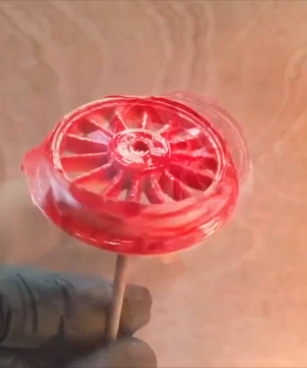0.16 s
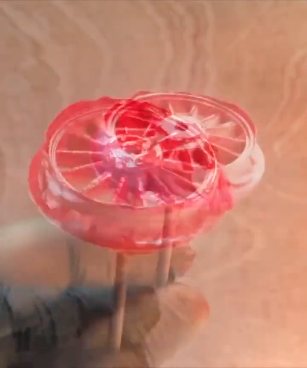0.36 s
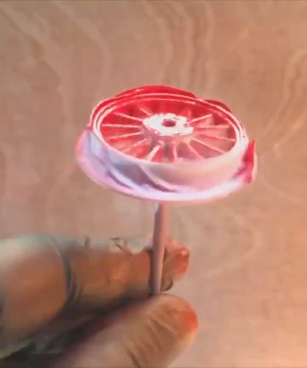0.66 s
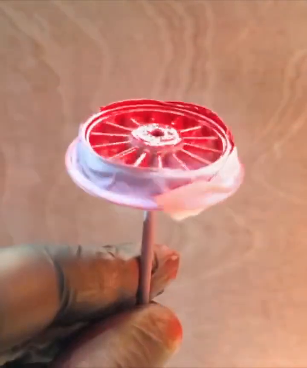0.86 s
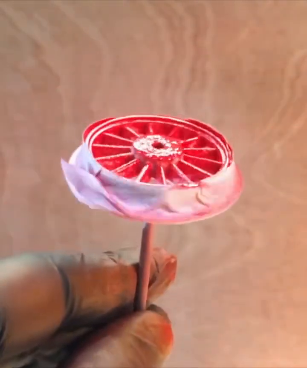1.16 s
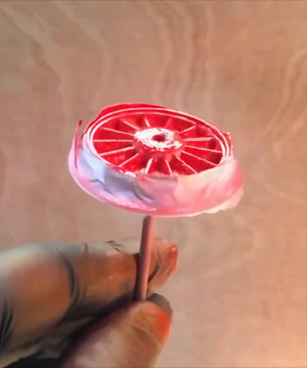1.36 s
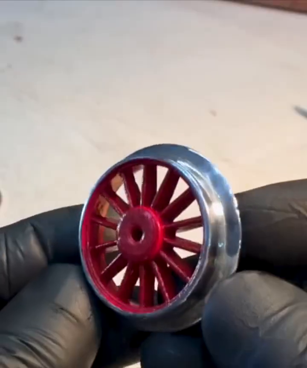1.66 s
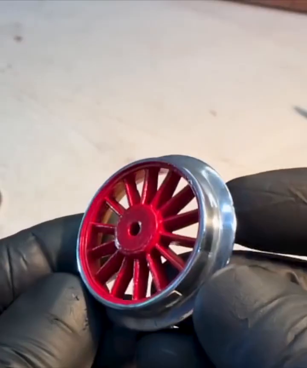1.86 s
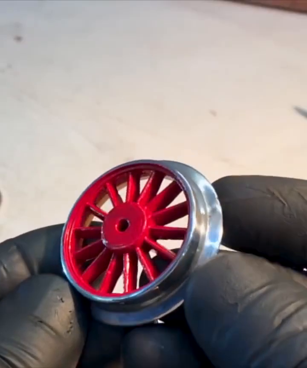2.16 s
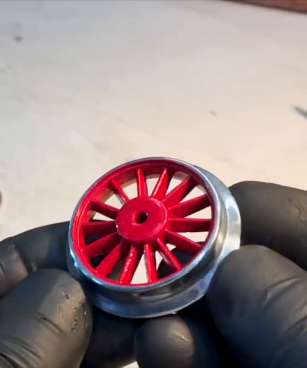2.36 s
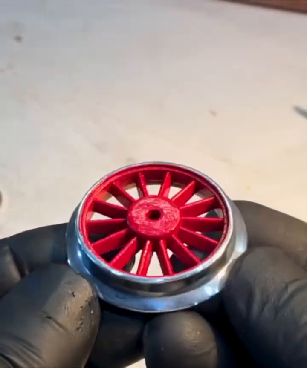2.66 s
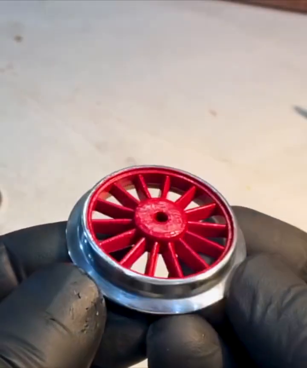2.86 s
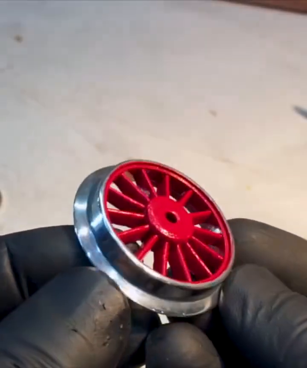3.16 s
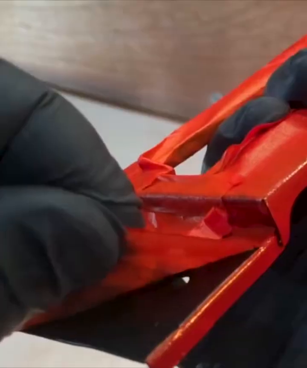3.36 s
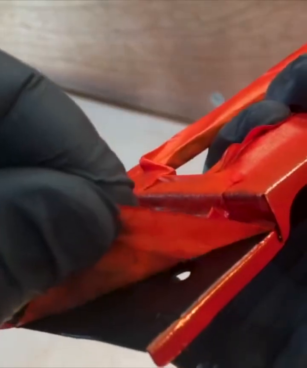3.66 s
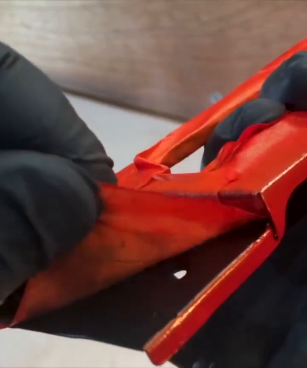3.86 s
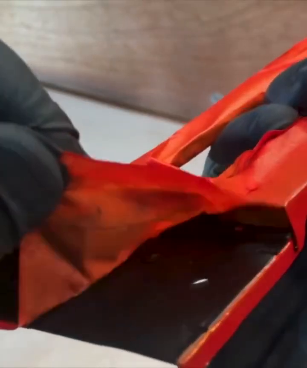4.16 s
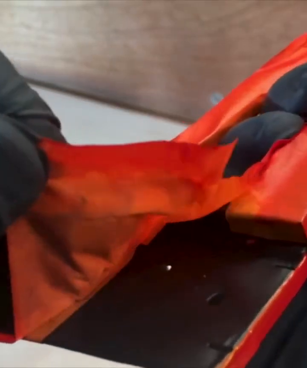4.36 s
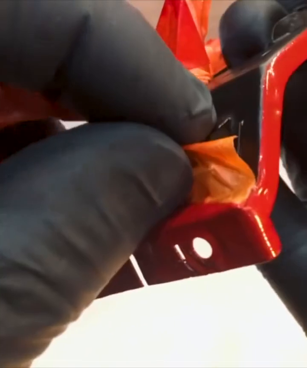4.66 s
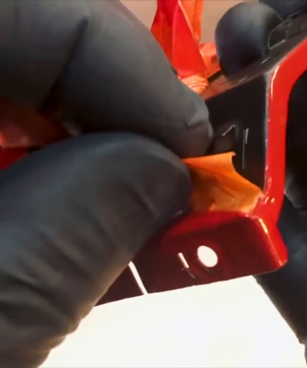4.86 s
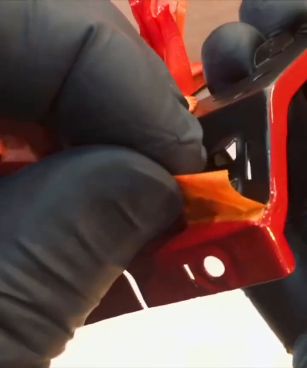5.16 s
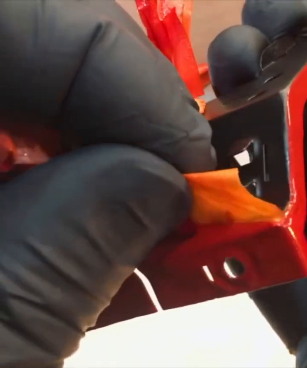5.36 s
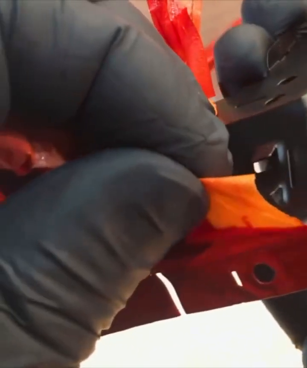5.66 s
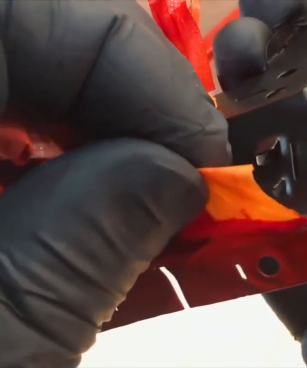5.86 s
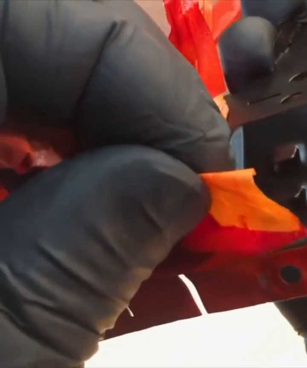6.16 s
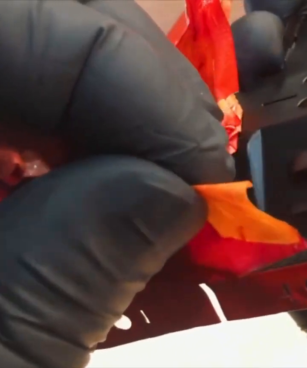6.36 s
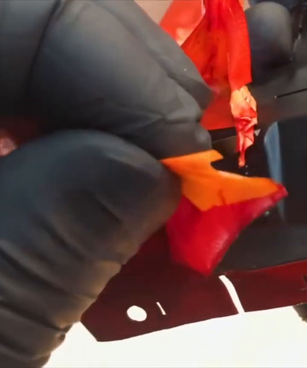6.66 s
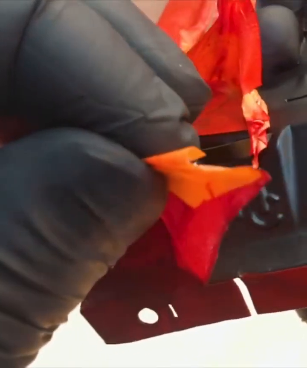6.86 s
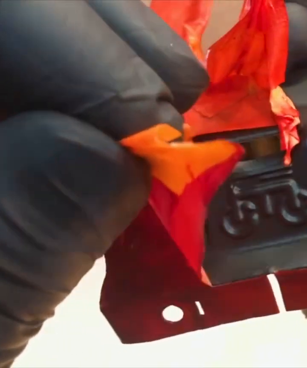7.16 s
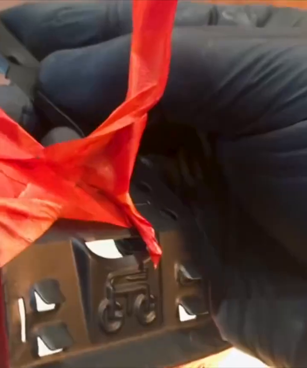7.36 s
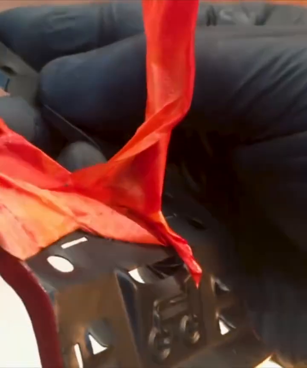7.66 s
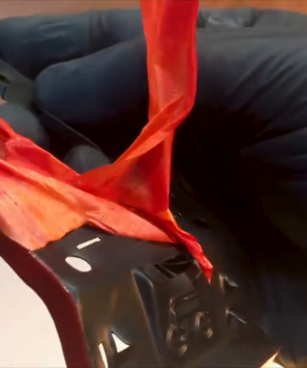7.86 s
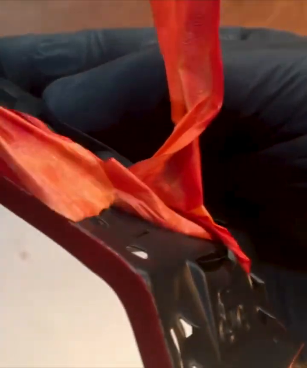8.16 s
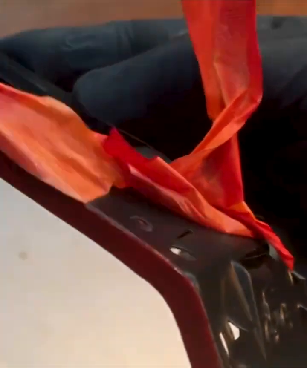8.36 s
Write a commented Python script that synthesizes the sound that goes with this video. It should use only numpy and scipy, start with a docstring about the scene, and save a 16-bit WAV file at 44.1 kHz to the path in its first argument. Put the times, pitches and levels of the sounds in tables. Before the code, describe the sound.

A spray can hisses brightly, swelling and spitting softly before it stops dead. A few tiny ticks and a faint glove rub dot the quiet workshop. Then masking tape is peeled off a painted metal frame close to the microphone: the glue crackles and the paper rustles and snaps, with one hard pull early on and smaller tugs after it, over a faint low hum.

```python
"""Over faint workshop room tone, a spray can hisses at a small part, swelling as it comes near and
spitting softly, then stops dead at 1.7 s. A few small ticks dot the quiet, and gloves rub faintly.
From 3.4 s a low hum wavers in the room while gloved hands peel masking tape off a painted metal frame,
close to a single microphone: glue threads crackle as they let go, the frame rings under them, and
the paper snaps and rustles, hardest near 4.2 s, then in smaller tugs to the end."""
import sys
import numpy as np
from scipy import signal
from scipy.fft import rfft, irfft, next_fast_len
from scipy.io import wavfile
from scipy.ndimage import uniform_filter1d

SR = 44100
rng = np.random.default_rng(int(sys.argv[2]) if len(sys.argv) > 2 else 0)


def master(y):
    """Save y as 16-bit WAV."""
    cut = np.clip(np.atleast_2d(y).T, -1, 1)
    pcm = np.round(cut * 32767)  # scale
    wavfile.write(sys.argv[1], SR, pcm.astype(np.int16))


N = 375732


def amp(db):
    return 10 ** (np.asarray(db) / 20)


def unit_rms(x):
    return x / np.sqrt(np.mean(x ** 2) + 1e-20)


def place(mix, start_s, sound):
    part = mix[round(start_s * SR):][:len(sound)]
    part += sound[:len(part)]


def equalise(x, curve):
    """Shapes x with an EQ curve drawn on a log-frequency axis, to rms 1."""
    curve_hz, curve_db = np.transpose(curve)
    size = next_fast_len(len(x), True)
    hz = np.fft.rfftfreq(size, 1 / SR)
    gain = amp(np.interp(np.log(hz + 1), np.log(curve_hz + 1), curve_db, left=-90))
    return unit_rms(irfft(rfft(x, size) * gain, size)[:len(x)])


def wander(length, smooth_s):
    """Smooth random modulation of rms 1."""
    width = max(round(smooth_s * SR), 2)
    return unit_rms(uniform_filter1d(uniform_filter1d(rng.standard_normal(length), width), width))


def ring(x, hz, width_hz):
    """Two-pole resonance, to rms 1."""
    r = np.exp(-np.pi * width_hz / SR)
    return unit_rms(signal.lfilter([1, 0, -1], [1, -2 * r * np.cos(2 * np.pi * hz / SR), r * r], x))


# EQ of the workshop's air: (frequency [Hz], relative level [dB])
ROOM_EQ = [(15, -7.5), (28, 3), (45, 4), (62, -6.5), (110, -13), (230, -20.5), (480, -29), (3700, -31),
           (13300, -35.5), (15700, -41)]


def room_tone(level_db=-65):
    """A steady, bass-heavy bed of air."""
    return amp(level_db) * equalise(rng.standard_normal(N), ROOM_EQ)


# Fader ride of the rumble: (time [s], level [dB])
RUMBLE_RIDE = [(1.7, -72), (3.3, -73), (3.45, -76), (4.2, -67.5), (4.4, -81), (7.7, -86.5), (8.52, -74)]


def rumble():
    """A narrow band of low noise that comes and goes."""
    times, db = np.transpose(RUMBLE_RIDE)
    fader = amp(np.interp(np.arange(N) / SR, times, db))
    return fader * ring(rng.standard_normal(N), hz=111, width_hz=27)


# EQ of the jet's bright hiss: (frequency [Hz], relative level [dB])
HISS_EQ = [(900, -21.5), (2200, -18), (4400, -8), (5200, -6.5), (5800, -4), (6500, -7.5), (7200, -6),
           (8000, -8), (9200, -6), (10600, -7.5), (11300, -2.5), (12300, -2), (12900, 1.5), (14200, 0),
           (14600, 4), (15700, 1.5)]
# EQ of the jet's dull roar: (frequency [Hz], relative level [dB])
ROAR_EQ = [(18, -48), (30, -15), (54, 3), (187, 1.5), (2500, -2), (3800, -3), (6500, -26)]


def spray_can(mix, approach_s=.49, swell_s=.12, stop_s=1.68):
    """A turbulent jet, gritty with droplets: hiss and roar flutter together and swell as it nears."""
    t = np.arange(2 * SR) / SR
    near = (1 + np.tanh((t - approach_s) / swell_s / 2)) / 2  # 0 far, 1 close
    flutter = amp(.8 * wander(len(t), .004) + .3 * wander(len(t), .03))
    grit = amp(2.8 * wander(len(t), .0001))
    hiss = amp(-39.5 + 13 * near) * equalise(grit * rng.standard_normal(len(t)), HISS_EQ)
    top = signal.sosfiltfilt(signal.butter(2, 11000, "high", fs=SR, output="sos"), hiss)
    hiss = hiss - (1 - amp(-4 * (1 - near))) * top  # duller from afar
    roar = amp(-53 + 6 * near) * equalise(grit * rng.standard_normal(len(t)), ROAR_EQ)
    attack = amp(5 * np.exp(-t / .035))  # starts a little hard, then settles
    gate = amp(-3500 * np.maximum(t - stop_s, 0))
    place(mix, 0, attack * flutter * gate * (hiss + roar))


# Paint spitting at the nozzle: (time [s], peak level [dB])
NOZZLE_SPITS = [(0.623, -20), (0.729, -19), (0.798, -23.5), (1.065, -24.5), (1.163, -20.5)]


def nozzle_spits(mix):
    """Each spit of paint is a tiny, heavily damped pop."""
    pop = ring(signal.windows.hann(256) ** 3000, hz=1000, width_hz=6000)
    for time_s, db in NOZZLE_SPITS:
        place(mix, time_s, amp(db) * pop / abs(pop).max())


# Single cracks of glove, glue and paper:
# (time [s], body peak [dB], body pitch [Hz], treble against body [dB])
CRACKS = [(2.0277, -53, 2970, 1), (2.256, -56, 2260, 8.5), (2.7013, -49, 7560, -2),
          (3.4579, -30.5, 6800, 4), (3.535, -41, 4530, -8), (3.709, -35, 6000, -7), (3.893, -40, 2450, 3),
          (4.192, -15, 6400, -2), (4.2112, -6, 3840, -15), (4.2148, -16, 4170, -10),
          (4.2235, -12, 4600, -12), (4.2847, -19, 3760, 0), (4.3223, -16.5, 3340, -26),
          (4.486, -30, 6600, -1), (4.6846, -40, 3660, 6), (4.7497, -34.5, 3560, -4),
          (5.0149, -33.5, 8300, 3.5), (5.096, -24, 7500, 7.5), (5.111, -38, 7900, 0),
          (5.1977, -35, 7000, 5), (5.2045, -39, 7580, -20), (5.2391, -11.5, 7150, 4),
          (5.344, -40.5, 6700, -10), (5.567, -32.5, 5400, -19), (5.693, -27.5, 5170, -5),
          (5.744, -44.5, 6680, 14), (5.9809, -37.5, 5095, 4.5), (6.161, -39, 6710, 2),
          (6.1789, -37, 5200, 7.5), (6.2507, -41, 6050, 11), (6.3203, -45, 4335, 0), (6.3684, -31, 6280, 4),
          (6.4223, -24, 6500, -15), (6.4912, -30.5, 7500, 4.5), (6.494, -27, 7900, 8),
          (6.576, -35, 6530, -10), (6.6512, -29, 5890, 0), (6.9496, -33.5, 2280, 3), (6.9837, -36, 4170, 2),
          (7.026, -31, 6340, -14), (7.049, -30, 4540, 2), (7.257, -31.5, 4500, 0),
          (7.3152, -31.5, 2253, -10), (7.5628, -22, 3220, 10), (7.5698, -26, 7560, -7),
          (7.613, -31, 7770, -3), (7.6515, -21.5, 7700, 6), (7.83, -36, 6465, -5), (7.9824, -35, 7210, 2),
          (8.0399, -33, 6440, -15), (8.086, -33.5, 6500, -9), (8.1848, -30.5, 6940, -12),
          (8.1877, -25.5, 6900, -3), (8.2621, -23, 6780, -22), (8.268, -24, 6900, -18),
          (8.2734, -28.5, 7170, -8), (8.332, -31.5, 6300, 5), (8.3495, -30, 6300, 0),
          (8.458, -42, 6160, -2)]


def cracks(mix, creep_s=.005):
    """Each crack creeps up, breaks in a millisecond, rings the paper and scatters off the bench."""
    t = np.arange(2048) / SR - creep_s
    creep = .1 * amp(60 * np.minimum(t, 0) / .007)
    snap = amp(-60 * abs(t) / .0017)
    scatter = .04 * amp(-60 * abs(t) / .065)
    envelope = np.where(t < 0, creep, snap + scatter)
    low_cut = signal.butter(2, 1700, "high", fs=SR)  # a thin strip radiates little bass
    for time_s, db, hz, treble_db in CRACKS:
        burst = envelope * rng.standard_normal(len(t))
        pitched = ring(ring(burst, hz, .7 * hz), hz, .5 * hz)
        broad = ring(ring(burst, 3600, 6000), 3600, 6000)
        frame_knock = ring(burst, 1100, 910)
        body = signal.lfilter(*low_cut, pitched + .4 * broad) + .062 * frame_knock
        treble = ring(ring(burst, 15700, 11500), 7600, 13500)
        crack = body / abs(body).max() + amp(treble_db) * treble / abs(treble).max()
        place(mix, time_s - creep_s, amp(db) * crack)


# Accents where the hand tugs harder:
# (peak time [s], rise [s], fall [s], crackle level [dB], frame ring level [dB])
HAND_TUGS = [(2.903, .1, .15, -73.5, -79.5), (3.148, 0.27, .2, -70, -94), (3.37, 0.055, 0.24, -49.5, -71),
             (3.53, 0.45, 0.053, -55, -69), (3.89, 0.1, 0.25, -39.5, -59), (4.2, 0.097, 0.069, -26.5, -42),
             (4.41, 0.024, 0.04, -37.5, -50), (4.545, 0.25, 0.23, -40, -49),
             (4.677, 0.11, 0.043, -48.5, -63), (4.751, 0.1, 0.086, -54.5, -60),
             (4.89, 0.046, 0.15, -59.5, -69.5), (5.04, 0.026, 0.024, -55, -74), (5.2, .05, 0.018, -59, -72),
             (5.245, .01, 0.12, -57, -70), (5.468, 0.2, 0.1, -54, -78), (5.569, 0.062, 0.042, -51, -81),
             (5.723, 0.068, 0.077, -52.5, -78), (6.05, 0.47, 0.67, -54.5, -60.5),
             (6.39, 0.097, 0.14, -47.5, -75), (6.495, 0.095, 0.077, -41.5, -54),
             (6.645, 0.041, 0.066, -54, -61), (6.956, 0.26, 0.31, -50, -59.5),
             (7.21, 0.11, 0.15, -53.5, -57.5), (7.567, 0.023, 0.13, -40, -58),
             (7.636, 0.0062, 0.045, -32.5, -59), (7.825, 0.045, 0.2, -50.5, -73),
             (8.062, 0.13, 0.065, -46, -63.5), (8.266, 0.023, 0.039, -41, -55),
             (8.376, 0.03, 0.077, -47, -56.5), (8.459, 0.005, 1, -45, -56)]


def hand_effort(t, from_db, to_db, frame_db, tug_depth_db=20):
    """Faders for crackle and frame ring: the steady pull and its tugs add in power."""
    steady_db = np.linspace(from_db, to_db, len(t))
    power = amp([steady_db, steady_db + frame_db]) ** 2
    for peak_s, rise_s, fall_s, *levels_db in HAND_TUGS:
        if t[0] <= peak_s <= t[-1] + 1 / SR:
            off_peak = np.maximum((peak_s - t) / rise_s, (t - peak_s) / fall_s)
            power = power + amp(np.c_[levels_db] - tug_depth_db * off_peak) ** 2
    return np.sqrt(power)


# Bands of the tape, shaken separately: (low edge [Hz], high edge [Hz])
TAPE_BANDS = [(1000, 5000), (5000, 8400), (8400, 18000)]


def glue_crackle(eq, start_s, end_s, from_db, to_db, frame_db, frame_hz, width_hz, fizz):
    """Glue threads let go in clumps; each shakes the tape and the frame, some parts more than others."""
    t = np.arange(start_s, end_s, 1 / SR)
    crackle_gain, frame_gain = hand_effort(t, from_db, to_db, frame_db)
    clumps = amp(2.4 * wander(len(t), .0052))
    breaks = rng.random(len(t)) < 800 * clumps / SR  # about 800 threads a second
    grains = breaks * amp(3.5 * np.minimum(rng.exponential(1, len(t)), 2.6))
    sends = amp(3.5 * rng.standard_normal((4, len(t))))  # three tape bands, then the frame
    decay = amp(-60 * np.arange(256) / SR / .002)
    energy = signal.oaconvolve((grains * sends) ** 2, decay[None] ** 2, axes=1)[:, :len(t)]
    shaking = unit_rms(energy.clip(0) ** .5)
    drive = (fizz * clumps ** .5 + shaking) * rng.standard_normal(sends.shape)
    strip = 0
    for band_drive, edges_hz in zip(drive, TAPE_BANDS):
        twist = amp(1.6 * wander(len(t), .03))  # the strip twists and its colour shifts
        strip = strip + twist * signal.lfilter(*signal.butter(2, edges_hz, "band", fs=SR), band_drive)
    tape = crackle_gain * equalise(strip, eq)
    metal = frame_gain * ring(ring(drive[-1], frame_hz, width_hz), frame_hz, 1700)
    return (tape + metal) * signal.windows.tukey(len(t), .004)


# EQ curves of the tape's changing tone, each: (frequency [Hz], relative level [dB])
TAPE_EQS = [
    [(1650, -51.5), (2950, -21), (3650, -6), (4450, -7), (6300, -2), (8300, -3.5), (9730, -1), (11900, -4),
     (13400, 1), (15600, 1)],
    [(1650, -41), (2800, -8), (4700, -6), (5250, 4.5), (5900, -4), (6800, -1.5), (9700, 0.5), (11300, -10),
     (14100, 0.5), (15650, -9)],
    [(1650, -18), (2800, -11), (3400, -4.5), (4380, 4.5), (5430, -0.5), (6410, 1.5), (8550, -1.5),
     (9590, -1.5), (12800, -0.5), (15600, -1)],
    [(1650, -40.5), (2800, -22), (4910, -8), (6550, -2.5), (8550, 0), (9250, 1), (11400, -8), (13800, -0.5),
     (15600, -4)],
]
# Stretches of rubbing and peeling: (start [s], end [s], crackle at start [dB], crackle at end [dB],
# frame ring against crackle [dB], frame pitch [Hz], ring width [Hz], smooth fizz against grains [ratio])
STRETCHES = [(2.8, 3.361, -93, -80, -6, 2220, 2700, 1.2), (3.365, 4.33, -59.5, -46, -14, 2236, 1550, 1.24),
             (4.331, 4.577, -38.5, -65, -15, 2260, 1500, 1.5),
             (4.578, 4.997, -65, -66, -22, 3100, 1500, 0.71),
             (4.999, 5.857, -68.5, -59.5, -28, 2370, 3370, 0.51),
             (5.855, 6.291, -70, -59, -22, 2740, 3020, 0.93),
             (6.289, 7.4, -52, -62, -13.5, 2290, 380, 0.74), (7.395, 7.7, -61.5, -60, -14, 2600, 2180, 1.5),
             (7.697, 8.53, -63.5, -52, -15.5, 2180, 2220, 1.24)]


def tape_peeling(mix):
    """A faint glove rub, then tape peeling in eight stretches with four tone colours."""
    colours = [0, 0, 0, 0, 1, 2, 2, 3, 3]
    for colour, (start_s, *settings) in zip(colours, STRETCHES):
        place(mix, start_s, glue_crackle(TAPE_EQS[colour], start_s, *settings))


# Pitch and fader ride of the room's hum: (time [s], pitch [Hz], level [dB])
HUM_RIDE = [(3.37, 40.56, -60), (4.49, 39.8, -62.5), (4.62, 40, -55.5), (6.53, 38.42, -56),
            (6.7, 36.84, -68.5), (7.299, 36.83, -59.5), (7.43, 31.7, -73), (8.1, 31.3, -64),
            (8.52, 33.4, -55.5)]


def room_hum(mix):
    """A sub-bass tone, wavering in pitch and level, with a steady skirt of noise."""
    times, hz, db = np.transpose(HUM_RIDE)
    t = np.arange(times[0], N / SR, 1 / SR)
    pitch_hz = np.interp(t, times, hz) * (1 + .021 * wander(len(t), .088))
    waver = amp(3.2 * wander(len(t), .074))
    tone = np.sqrt(2) * np.sin(2 * np.pi * np.cumsum(pitch_hz) / SR) * waver
    skirt = equalise(rng.standard_normal(len(t)), [(18, -20), (30, -2.5), (60, 15), (130, -14)])
    hum = amp(np.interp(t, times, db)) * tone + amp(-67) * skirt
    fade_in = np.minimum((t - times[0]) / .013, 1)
    place(mix, times[0], fade_in * hum)


# Handling noise: (time [s], length [s], puff level [dB], creak pitch [Hz], creak level [dB],
# thump level [dB])
HAND_RUSTLES = [(3.803, 0.14, -69, 940, -67.5, -102), (4.126, 0.1, -63, 820, -56.5, -69),
                (4.358, 0.25, -62, 897, -67, -80), (4.648, 0.059, -57.5, 900, -68.5, -69),
                (5.237, 0.06, -61, 884, -78, -69), (6.45, 0.11, -62, 876, -81, -74),
                (7.552, 0.12, -61, 870, -80, -61.5), (8.457, 0.16, -51, 690, -64, -75)]


def hand_rustles(mix):
    """Hands shift the part: each move is a soft, broad puff with a lumpy creak and a low thump."""
    puff_eq = [(120, -9), (300, -4.5), (700, -23), (1800, -6), (3000, -11)]
    for time_s, length_s, puff_db, creak_hz, creak_db, thump_db in HAND_RUSTLES:
        n = round(length_s * SR)
        puff = equalise(rng.standard_normal(n), puff_eq)
        lumps = amp(3.5 * wander(n, .005))
        steady_creak = ring(rng.standard_normal(2 * n), creak_hz, width_hz=280)
        speed = (1 + .098 * wander(n, .0142)).clip(.5, 2)  # the pitch bends as the grip changes
        creak = lumps * np.interp(np.cumsum(speed), np.arange(2 * n), steady_creak)
        thump = ring(rng.standard_normal(n), hz=87, width_hz=82)
        rustle = amp(puff_db) * puff + amp(creak_db) * creak + amp(thump_db) * thump
        place(mix, time_s, rustle * signal.windows.tukey(n, .45))


def scene():
    """The bed, then each layer in order of entry, the same on both channels."""
    mix = room_tone() + rumble()
    for add_layer in (spray_can, nozzle_spits, cracks, tape_peeling, room_hum, hand_rustles):
        add_layer(mix)
    return np.array([mix, mix])


# Notches of the microphone housing: (centre [Hz], width [Hz], gain [dB])
HOUSING_NOTCHES = [(4950, 330, -5), (8350, 520, -5)]


def record(dry):
    """The microphone housing cuts two narrow dips; a steep high cut follows."""
    out = dry
    for hz, width_hz, db in HOUSING_NOTCHES:
        b, a = signal.iirpeak(hz, hz / width_hz, SR)
        out = out - (1 - amp(db)) * signal.lfilter(b, a, out)
    high_cut = signal.firwin(1279, 15715, window=("kaiser", 10), fs=SR)
    return signal.oaconvolve(out, high_cut[None], "same")


dry = scene()
out = record(dry)
master(out)
```